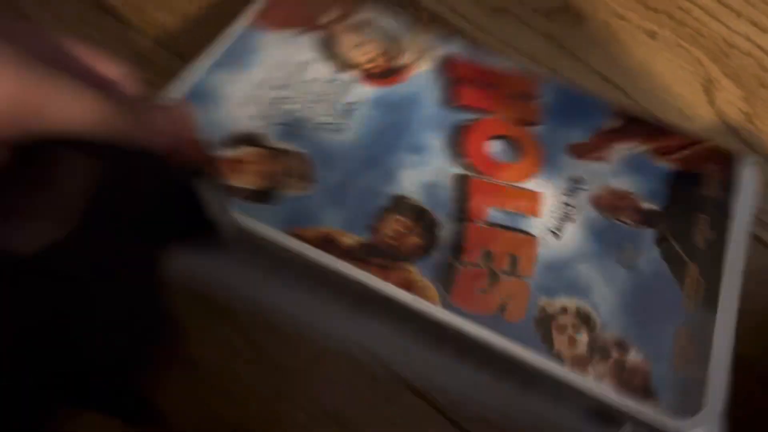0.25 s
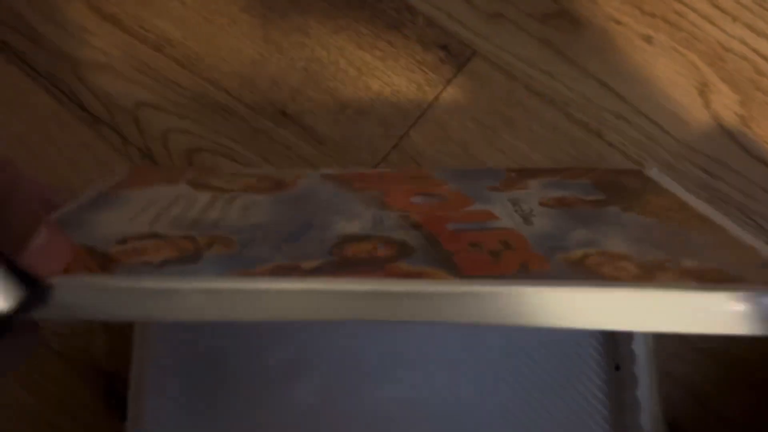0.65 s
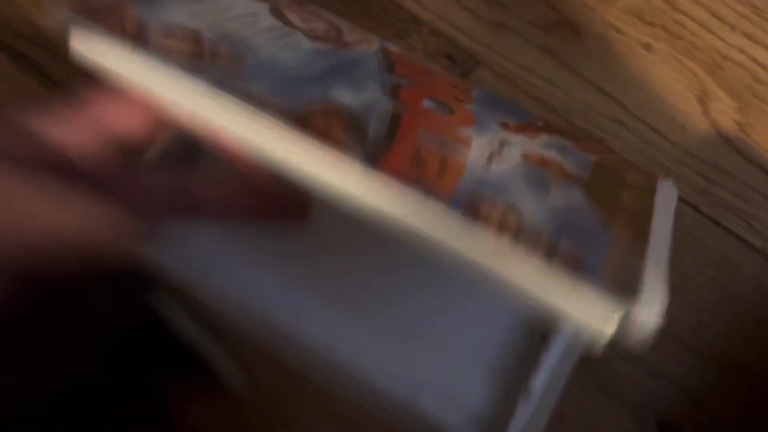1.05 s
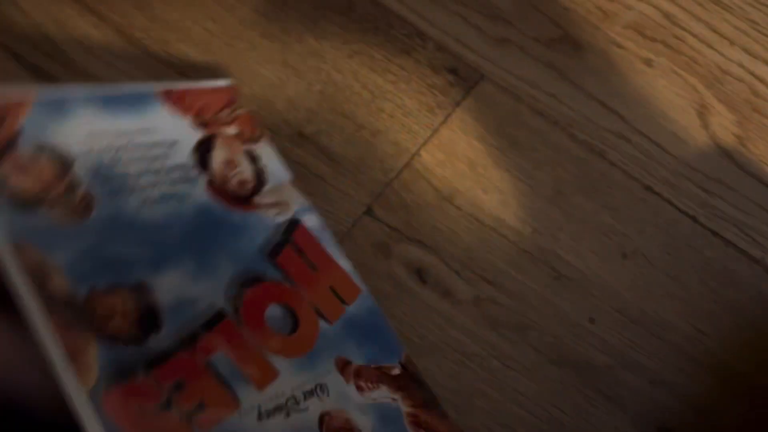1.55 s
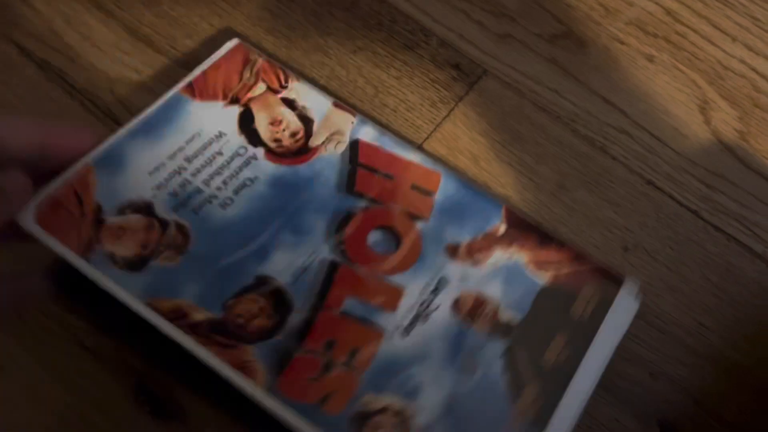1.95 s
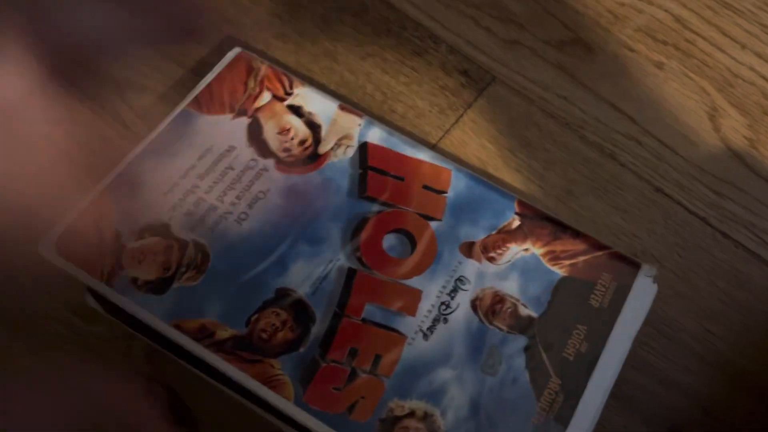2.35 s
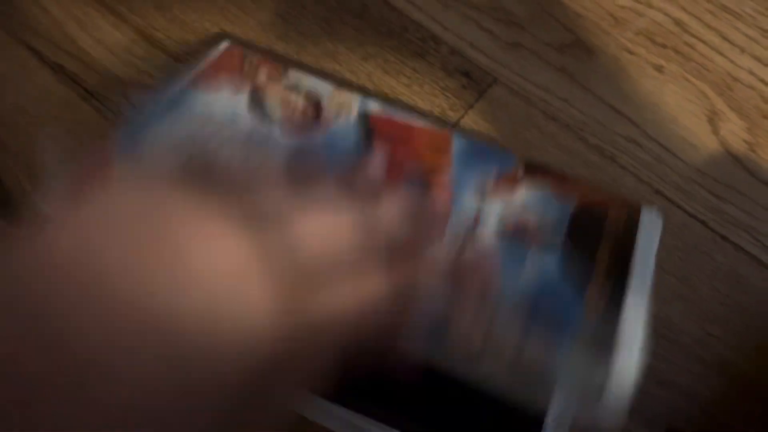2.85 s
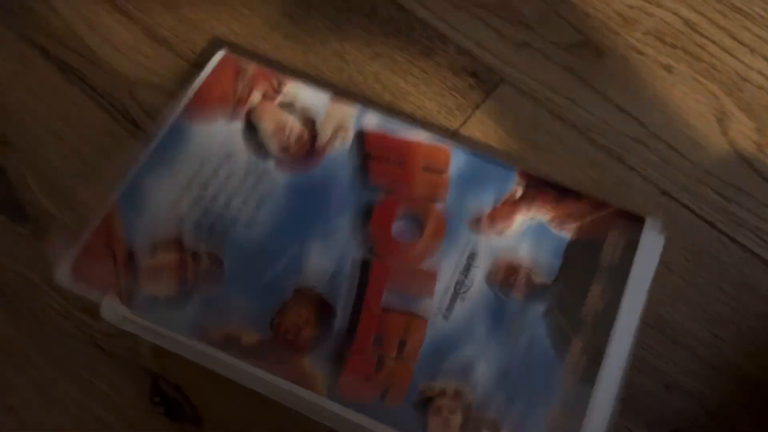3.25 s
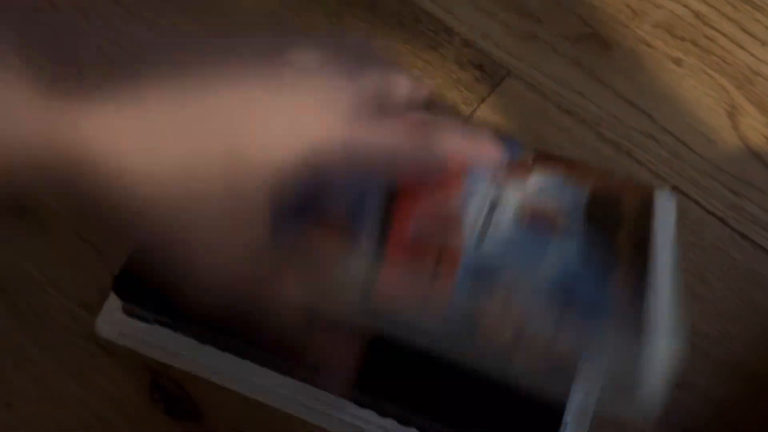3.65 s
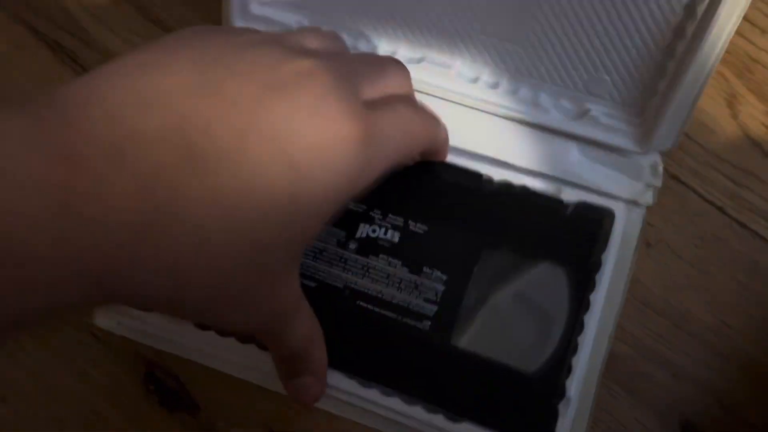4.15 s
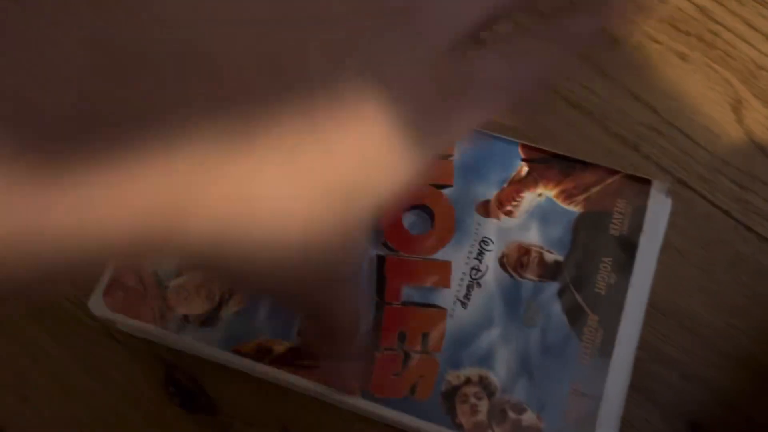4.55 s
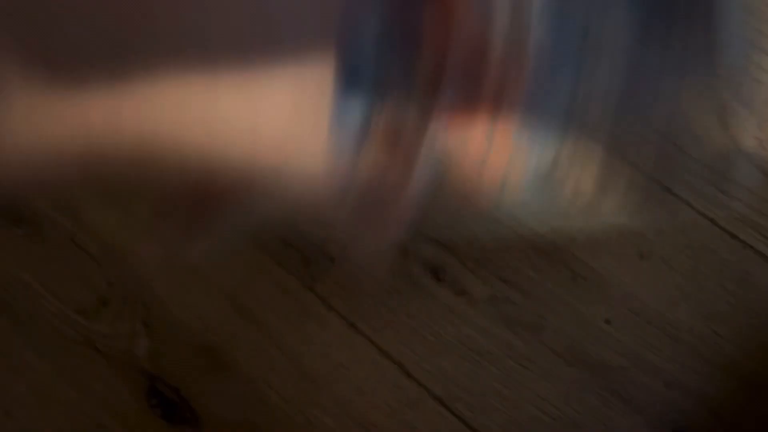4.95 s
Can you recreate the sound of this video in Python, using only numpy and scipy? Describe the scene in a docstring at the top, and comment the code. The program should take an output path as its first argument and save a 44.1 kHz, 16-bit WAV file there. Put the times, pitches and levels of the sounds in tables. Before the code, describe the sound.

A plastic cassette case is handled on floorboards, very near the microphone. Quiet clicks and sliding come first, then a loud double clatter with a brief scrape, a flat lid slap with a soft thud, finger pats, a sharp knock at 3.2 seconds, and more catches snapping near 4.5. The small room is dry, with faint steady hum.

```python
"""Hands rub a plastic clamshell video case and its clear sleeve, close by, on a wooden floor in a small room.
Near 1.9 s the cassette slides in and clatters into its tray; at 2.5 s the lid is slapped shut; then it is
pried open again, its rim ticking and crackling. Contacts are decaying noise bands with a panel note, rubs
are trains of tiny slips; both excite the shell's resonances. Boards thud as damped tones under pushes.
Throughout lie a sine of mains hum, a faint whirr and the soft rush of the room, both filtered noise."""
import sys
import numpy as np
from scipy import signal
from scipy.fft import rfft, irfft, next_fast_len
from scipy.io import wavfile

SR = 44100
rng = np.random.default_rng(int(sys.argv[2]) if len(sys.argv) > 2 else 0)


def store_wav(level_fs):
    """Save 16-bit WAV to argv[1]."""
    pcm = np.round(np.clip(np.atleast_2d(level_fs), -1, 1) * 32767)
    wavfile.write(sys.argv[1], SR, pcm.T.astype(np.int16))


N = 229533
TIME = np.arange(N) / SR

# the case knocks against cassette, lid and floor
# columns: start_s, level_db, brightness_db_per_octave, note_hz, note_relative_to_level_db
KNOCKS = [(0.016, -30.5, -0.5, 656, -3), (0.373, -30, 1.9, 3830, -2), (0.597, -36.5, 0.5, 900, 0.5),
          (1.085, -31, 0.5, 580, -3.5), (1.222, -34, 1.7, 666, -4), (1.333, -31.5, -3.5, 1290, -11),
          (1.579, -25.5, 0, 950, -4), (1.851, -14.5, 1, 720, 3), (1.857, -13, -1, 776, -9),
          (1.876, -22, 0, 1175, 1), (1.902, -11.5, -1.5, 1140, 2.3), (1.907, -19.5, 0.6, 567, -2),
          (1.96, -34.5, 2.5, 687, 8), (1.971, -31, 1.5, 760, -5), (1.983, -28, 0.7, 913, -5),
          (1.991, -22, 0, 990, 1), (2.002, -34.5, 2.7, 446, 11.5), (2.046, -34, -0.6, 1160, 5.5),
          (2.499, -30, 2, 800, 12), (2.512, -14.5, -0.2, 440, -8.5), (2.528, -28, -5.5, 800, -7),
          (3.228, -14, -0.3, 710, -7), (3.234, -19.5, 1.56, 660, -5.5), (3.442, -37.5, 2.5, 450, 5),
          (3.975, -37, -0.8, 900, -8), (4.021, -31, -3, 910, -14), (4.038, -28, 0.7, 1184, 4),
          (4.459, -21.5, -3, 680, -2.5), (4.461, -26.5, -6, 227, 8), (4.576, -19.5, -4, 930, -16),
          (4.578, -16, -1.1, 1028, 4), (4.589, -23.5, -4.1, 372, 3.5), (4.706, -28.5, -1.7, 430, -2.5),
          (4.797, -31, 1.5, 1155, -7), (4.896, -37.5, -2, 1090, -5)]
# how a knock shares out its level: thump_db, body_db, clack_db, snap_db
KNOCK_SHARES = [-13, -1, -1.5, -4.5]


def knocks():
    """Impact of hard bodies: short broadband chatter, strong in body and clack."""
    return contacts(KNOCKS, KNOCK_SHARES, base_t60_s=0.026)


# palm and fingertips pat the hollow lid
# columns: start_s, level_db, brightness_db_per_octave, note_hz, note_relative_to_level_db
PATS = [(0.054, -40, 4, 663, 8), (0.643, -39.5, 6, 680, -1), (2.504, -11.5, -0.2, 533, -9.5),
        (2.645, -32, -1.5, 566, 2.5), (2.684, -33, -4.7, 660, 5), (2.69, -31.5, 3.7, 664, -8),
        (2.709, -25.5, 2.3, 612, 6.5), (2.79, -36.5, 0.5, 1210, 4), (3.46, -41, -3.5, 606, 9.5),
        (4.485, -29.5, 4, 440, -5), (4.847, -37.5, -3, 600, -3), (5.098, -37, 0.4, 348, -10)]
# how a pat shares out its level: thump_db, body_db, clack_db, snap_db
PAT_SHARES = [-14, 1.5, -24, -26]


def pats():
    """Soft impact: a yielding hand rings longer and shares little level with the upper registers."""
    return contacts(PATS, PAT_SHARES, base_t60_s=0.033)


# the rim and the catches tick as they flex
# columns: start_s, level_db, brightness_db_per_octave, note_hz, note_relative_to_level_db
TICKS = [(0.36, -22, -0.8, 4050, -11), (0.418, -35.5, -1.5, 2920, -2), (0.49, -33, 0, 4120, -12),
         (0.498, -42.5, -2, 4200, 9), (0.531, -37, -1, 2880, -5), (0.542, -28.5, -0.6, 2770, -0.5),
         (0.844, -40, -3, 3380, 2.5), (1.144, -38, 0, 4560, -4), (1.406, -31, -5, 1680, 0),
         (1.63, -25.5, -0.8, 2990, -19), (1.716, -29, 3.24, 3470, -23), (1.935, -52, 9.5, 970, -1.5),
         (2.073, -40.5, 0.7, 1270, -10), (2.133, -41, -0.5, 453, -7), (2.858, -39.5, -0.6, 2860, -9.5),
         (3.379, -40, 1.5, 2470, 0), (3.697, -38.5, 1.7, 4000, -11), (3.706, -43, 5, 2320, -13),
         (3.747, -32, -3, 1110, -3.5), (3.785, -31, 1, 4710, -5), (3.801, -38.5, 5, 2270, -12),
         (3.883, -32, -4.5, 1670, -17), (4.22, -37, 1.7, 4620, -0.5), (4.302, -30, -3, 1550, 4.5),
         (4.416, -43.5, 3.5, 1350, 6.5), (4.429, -45.5, 4.7, 1010, -6), (4.458, -22, -2, 2060, -0.8),
         (4.57, -31, 1, 1870, -8), (4.746, -44.5, 2.9, 1140, -12), (5.062, -35.5, -3.1, 1960, -8),
         (5.14, -35.5, -0.9, 614, -6.5), (5.157, -31.5, -0.4, 2660, -9)]
# how a tick shares out its level: thump_db, body_db, clack_db, snap_db
TICK_SHARES = [-23, -10, -1, -4]


def ticks():
    """Sudden release of strain in small parts: the briefest decay, weighted to the treble."""
    return contacts(TICKS, TICK_SHARES, base_t60_s=0.022)


# the ranges of thump, body, clack and snap; columns: low_hz, high_hz
REGISTERS = [(195, 371), (335, 1125), (1400, 3870), (4500, 11440)]


def contacts(rows, shares_db, base_t60_s, thump_ring=2.4, body_ring=1.1, clack_ring=0.97, snap_ring=0.66,
             note_ring=0.9, softness=0.04, thump_rise_s=0.0056, note_rise_s=0.0017, grit_db=4.0,
             brush_s=0.004, brush_db=-17.0):
    """Impact excitation: dying chatter of the rim in four registers, and the note of the bent panel (mid, side)."""
    since_blow = TIME[:SR // 5] - brush_s
    t = np.maximum(since_blow, 0)
    # the edges brush each other just before the full blow lands
    brush = from_db(brush_db) * np.minimum(1 + since_blow / brush_s, 1) ** 2
    out = np.zeros((2, N + len(t)))
    attack_samples = SR // 125
    filters = [signal.butter(2, edges, "band", fs=SR, output="sos") for edges in REGISTERS]
    # positive brightness tilts the registers towards the treble, about 1000 Hz
    octaves = np.log2(np.array(REGISTERS) / 1000).mean(axis=1)
    # kinds that ring longer also start more slowly; the thump has a slow rise of its own
    rises_s = [thump_rise_s] + [softness * base_t60_s] * 3
    ring_factors = (thump_ring, body_ring, clack_ring, snap_ring)
    for start_s, level_db, brightness, note_hz, note_db in rows:
        first = int(max(start_s - brush_s, 0) * SR)
        parts = []
        for sos, rise_s, ring_factor in zip(filters, rises_s, ring_factors):
            grit = from_db(grit_db * rng.standard_normal(len(t)))
            chatter = rng.standard_normal((2, len(t))) * grit
            decay = from_db(-60 * t / (base_t60_s * ring_factor))
            force = (brush + 1 - np.exp(-t / rise_s)) * decay
            parts.append(signal.sosfilt(sos, chatter * force + 1e-18))
        note = ring(t, note_hz, base_t60_s * note_ring, note_rise_s)
        parts.append(note * rng.choice([-1, 1], (2, 1)))
        parts_db = level_db + np.append(shares_db + brightness * octaves, note_db)
        for part, part_db in zip(parts, parts_db):
            # a level is the part's whole energy spread over 8 ms
            strength = np.sqrt(np.sum(part ** 2, axis=1, keepdims=True) / attack_samples)
            out[:, first:first + len(t)] += from_db(part_db) * part / strength
    return out[:, :N]


# spectrum of juddering drag; columns: frequency_hz, relative_density_db_per_hz
DRAG = [(60, -18.5), (180, -13), (330, -3), (650, -0.5), (1150, 0.5), (1550, -1.5), (2400, -14.5),
        (4000, -17), (9000, -36.5)]
# spectrum of smooth sliding; columns: frequency_hz, relative_density_db_per_hz
SLIDE = [(300, -12.5), (1000, -15), (1800, -2), (3500, -1.5), (6500, -6), (9000, -7), (13000, -12),
         (16000, -23.5)]


def rubbing(drag_trim_db=-1.5, pocket_db=-4.5, slide_trim_db=1.0, judder_db=3.0, flutter_db=2.5, crinkle_db=-8.0):
    """Stick-slip friction: coarse slips judder and sound the air pocket; very fine slips hiss (mid, side)."""
    drag_strength, slide_strength, pocket_hz = motion()
    slips = grains(per_s=800, spread_db=1.0)
    drag = from_db(drag_trim_db) * rms_one(colour(slips, DRAG))
    drag = drag + from_db(pocket_db) * pocket(slips, pocket_hz)
    slide = rms_one(colour(grains(per_s=6000, spread_db=3.5), SLIDE))
    slide += from_db(crinkle_db) * sleeve_crinkle()
    drag *= drag_strength * from_db(judder_db * drift(90))
    slide *= slide_strength * from_db(slide_trim_db + flutter_db * drift(110))
    return drag + slide


def sleeve_crinkle(t60_s=0.014):
    """Buckling of thin film: the clear sleeve gives tiny ticks at twelve pitches; rms 1."""
    crinkle = np.zeros((2, N))
    for hz in np.geomspace(1500, 5500, num=12):
        buckles = grains(per_s=11, spread_db=7.0)
        tick = ring(TIME[None, :SR // 20], hz, t60_s, 1 / hz)
        crinkle += signal.fftconvolve(buckles, tick, axes=1)[:, :N]
    return rms_one(crinkle)


def pocket(x, centre_hz, width_hz=140, block=128):
    """Cavity resonance gliding with the air pocket between hand, lid and tray; rms 1."""
    radius = np.exp(-np.pi * width_hz / SR)
    out, state = np.zeros_like(x), np.zeros((2, 2))
    for i in range(0, N, block):
        poles = [1, -2 * radius * np.cos(2 * np.pi * centre_hz[i] / SR), radius ** 2]
        out[:, i:i + block], state = signal.lfilter([1, 0, -1], poles, x[:, i:i + block], zi=state)
    return rms_one(out)


# strokes of plastic over plastic and skin, 20 dB down one swell before and one fade after the fastest moment
# columns: fastest_s, swell_s, fade_s, relative_drag_db, relative_slide_db, pocket_hz
STROKES = [(0.05, 0.1, 0.12, -41.5, -53, 660), (0.259, 0.16, 0.2, -42.5, -63, 1140),
           (0.39, 0.17, 0.052, -40, -34, 1110), (0.51, 0.04, 0.22, -45, -38.5, 1100),
           (0.62, 0.1, 0.12, -42.5, -46.5, 1320), (0.75, 0.08, 0.18, -49.5, -50, 1100),
           (0.9, 0.13, 0.4, -51, -45.5, 1100), (1.12, 0.07, 0.031, -42, -43.5, 648),
           (1.24, 0.045, 0.26, -45, -45.5, 800), (1.34, 0.17, 0.15, -43, -34, 860),
           (1.66, 0.12, 0.2, -41, -40, 980), (1.77, 0.15, 0.2, -48, -39.5, 1030),
           (1.885, 0.055, 0.098, -20.5, -24.5, 775), (2.0, 0.08, 0.059, -22, -33.5, 876),
           (2.08, 0.05, 0.13, -40.5, -57.5, 850), (2.525, 0.012, 0.1, -28, -33.5, 750),
           (2.711, 0.038, 0.021, -29, -44, 610), (2.8, 0.06, 0.17, -43.5, -48.5, 1240),
           (2.92, 0.12, 0.21, -55, -57.5, 1200), (3.39, 0.035, 0.086, -30.5, -35, 890),
           (3.435, 0.05, 0.045, -35, -48.5, 604), (3.585, 0.02, 0.055, -41, -44, 860),
           (3.66, 0.06, 0.06, -46.5, -47.5, 1000), (3.77, 0.035, 0.072, -44.5, -42.5, 2210),
           (4.043, 0.06, 0.1, -31.5, -40.5, 906), (4.118, 0.03, 0.16, -45.5, -55, 800),
           (4.464, 0.073, 0.05, -36, -38.5, 600), (4.751, 0.055, 0.053, -33, -41, 1110),
           (4.915, 0.05, 0.035, -40.5, -55.5, 1120), (5.18, 0.1, 0.067, -44, -45, 1160)]


def motion(shudder_drag_db=-20.5, shudder_slide_db=-30.5, shudder_rise_s=0.017, shudder_fall_s=0.075):
    """Addition of powers: strokes and shudders sum to drag and slide strength; drag weights the pocket's note."""
    # a knock or pat leaves the cassette shuddering in its tray, at levels set against the blow
    shudders = [(start_s + shudder_rise_s, shudder_rise_s, shudder_fall_s,
                 level_db + shudder_drag_db, level_db + shudder_slide_db, note_hz)
                for start_s, level_db, _, note_hz, _ in KNOCKS + PATS]
    columns = np.transpose(STROKES + shudders)[:, :, None]
    fastest_s, swell_s, fade_s, drag_db, slide_db, pocket_hz = columns
    t = TIME[::SR // 1000]
    shape_db = -20 * np.maximum((fastest_s - t) / swell_s, (t - fastest_s) / fade_s)
    drag_power = from_db(drag_db + shape_db) ** 2
    slide_power = from_db(slide_db + shape_db) ** 2
    total_drag = drag_power.sum(axis=0)
    mean_pocket_hz = (pocket_hz * drag_power).sum(axis=0) / total_drag
    controls = np.sqrt(total_drag), np.sqrt(slide_power.sum(axis=0)), mean_pocket_hz
    return [np.interp(TIME, t, control) for control in controls]


# resonances of the shell and the air in it; columns: frequency_hz, width_hz, level_relative_to_direct_db
SHELL = [(171, 19, -1), (262, 9.9, -7.5), (376, 44, -9.5), (451, 25, -3), (566, 33, -9), (699, 70, -6.5),
         (927, 27, -10), (1150, 18, -2.5), (2232, 220, -5), (2680, 370, -11.5), (3440, 23, -29.5),
         (3930, 27, -26), (4840, 92, -5)]


def shell(x, output_db=-2.5):
    """Modal resonance: whatever touches the case also sets its modes ringing, in parallel."""
    out = x.copy()
    for hz, width_hz, level_db in SHELL:
        radius = np.exp(-np.pi * width_hz / SR)
        zeros = np.array([1, 0, -1]) * (1 - radius * radius) / 2
        poles = [1, -2 * radius * np.cos(2 * np.pi * hz / SR), radius * radius]
        out += from_db(level_db) * signal.lfilter(zeros, poles, x)
    return from_db(output_db) * out


# weight coming down on the floorboards; columns: start_s, level_db, pitch_hz
THUDS = [(1.089, -34, 85), (1.468, -43.5, 69.5), (1.527, -42, 69.5), (1.579, -31, 79.3), (1.65, -39, 73),
         (1.91, -32.5, 83), (2.519, -22.5, 73), (3.236, -28.5, 119.6), (4.461, -26.5, 94),
         (4.591, -25.5, 75)]


def floorboards(t60_s=0.11, rise_s=0.0023, overtone=1.8, overtone_db=-8.0, overtone_t60_s=0.1):
    """Damped bending vibration: a short, deep thud under each push, with one quicker overtone."""
    out = np.zeros(N)
    for start_s, level_db, pitch_hz in THUDS:
        t = np.maximum(TIME - start_s, 0)
        thud = ring(t, pitch_hz, t60_s, rise_s)
        thud += from_db(overtone_db) * ring(t, pitch_hz * overtone, overtone_t60_s, rise_s)
        out += from_db(level_db) * thud
    return out


def room(mid, t60_s=0.16, level_db=-13, build_s=0.0018, treble_db=-9.0):
    """Diffuse reverberation: dense, slightly dull reflections from floor, walls and furniture (mid, side)."""
    t = TIME[:SR // 2]
    build = 1 - np.exp(-(t / build_s) ** 2)
    tail = rng.standard_normal((2, len(t))) * from_db(-60 * t / t60_s) * build
    tail /= np.sqrt(np.sum(tail ** 2, axis=1, keepdims=True))
    tail = colour(tail, [(150, 1.0), (900, -6.5), (4000, -0.2), (12000, treble_db)])
    return from_db(level_db) * signal.fftconvolve(mid[None], tail, axes=1)[:, :N]


# spectrum of the room's rush; columns: frequency_hz, relative_density_db_per_hz
ROOM_AIR = [(20, -30.5), (35, -5), (65, -6.5), (95, -6), (160, -9.5), (350, -10.5), (700, -16), (1150, -16),
            (1450, -9), (1800, -18), (4000, -23.5), (8000, -39.5), (16000, -43)]


def room_rush(level_db=-53):
    """Stationary noise: random air motion, shaped to a soft rush (mid, side)."""
    return from_db(level_db) * rms_one(colour(rng.standard_normal((2, N)), ROOM_AIR))


def whirr(centre_hz=1430, width_hz=150, level_db=-69):
    """Narrow-band noise: a slim band of the rush stands out as a faint whirr (mid, side)."""
    edges = [centre_hz - width_hz / 2, centre_hz + width_hz / 2]
    band = signal.butter(2, edges, "band", fs=SR, output="sos")
    return from_db(level_db) * rms_one(signal.sosfilt(band, rng.standard_normal((2, N))))


def hum(hz=59.9, rms_db=-56):
    """Periodic vibration: the steady mains hum is one pure tone."""
    return np.sqrt(2) * from_db(rms_db) * np.sin(2 * np.pi * hz * TIME)


def background():
    """Superposition: rush and whirr in mid and side, hum in mid alone."""
    air = room_rush() + whirr()
    air[0] += hum()
    return air


# how far the two microphone ports differ; columns: frequency_hz, side_gain_db
WIDTH = [(60, -12), (300, -9), (700, -8), (1400, -5), (4000, -7), (8000, -8), (15000, -49.5)]
# level between the ports; columns: frequency_hz, left_minus_right_db
BALANCE = [(60, 0.5), (130, 4), (290, 3.5), (480, 0), (680, -1.5), (1300, 0), (1900, 1), (2500, -0.5),
           (3400, 4), (5300, 2.5), (6200, -1), (16000, 0.5)]
# phase between the ports; columns: frequency_hz, left_lead_rad
LEAD = [(0, 0), (550, -.3), (800, .2), (2200, .2), (2800, .8), (4500, .4), (5500, -.4), (7400, -.2),
        (9700, -3.1), (11200, -3.9), (12100, -6.1), (13900, -6.6), (14700, -8.8), (16000, -9.4)]


def ports(mid, side):
    """Interaural-like cues: two ports hear level and phase differences that depend on frequency."""
    size = 2 * next_fast_len(N)
    hz = np.arange(size // 2 + 1) * SR / size
    half_level = from_db(np.interp(hz, *np.transpose(BALANCE)) / 2)
    half_phase = np.exp(0.5j * np.interp(hz, *np.transpose(LEAD)))
    half = half_level * half_phase
    side = colour(side, WIDTH)
    left_right = np.array([mid + side, mid - side])
    return irfft(rfft(left_right, size) * np.array([half, 1 / half]))[:, :N]


def from_db(db):
    """Logarithmic level: decibels to amplitude gain."""
    return 10 ** (np.asarray(db) / 20)


def rms_one(x):
    """Effective value: scale to unit rms."""
    return x / np.sqrt(np.mean(x ** 2) + 1e-20)


def ring(t, hz, t60_s, rise_s):
    """Damped oscillation: a sine that builds up and dies exponentially."""
    return np.sin(2 * np.pi * hz * t) * from_db(-60 * t / t60_s) * (1 - np.exp(-t / rise_s))


def grains(per_s, spread_db):
    """Poisson process: random tiny slips of uneven size (mid, side); rms 1."""
    born = rng.random(N) < per_s / SR
    size = from_db(spread_db * np.minimum(rng.exponential(1, N), 3))
    return rms_one(born * size * rng.choice([-1, 1], (2, N)))


def drift(per_s):
    """Random modulation: straight lines between chance values, per_s of them a second; rms 1."""
    knots = rng.standard_normal(N // 20)
    return rms_one(np.interp(TIME * per_s, np.arange(len(knots)), knots))


def colour(x, points):
    """Minimum-phase filtering: a causal filter, by way of the cepstrum, follows a table of (Hz, dB)."""
    size = 2 * next_fast_len(x.shape[-1])
    table_hz, table_db = np.transpose(points)
    hz = np.arange(size // 2 + 1) * SR / size
    gain_db = np.interp(np.log(hz + 1), np.log(table_hz), table_db)
    cepstrum = irfft(np.log(from_db(gain_db)))
    # folding the cepstrum onto positive time makes the filter causal
    cepstrum[1:size // 2] *= 2
    cepstrum[size // 2 + 1:] = 0
    return irfft(rfft(x, size) * np.exp(rfft(cepstrum)))[..., :x.shape[-1]]


def scene():
    """Superposition: the case, the floor, the room and its background, as left and right."""
    case = shell(knocks() + pats() + ticks() + rubbing())
    mid, side = case + room(case[0]) + background()
    return ports(mid + floorboards(), side)


# colour of the microphone; columns: frequency_hz, gain_db
MICROPHONE = [(30, 6), (150, 3.5), (600, 0.5), (1500, -1.5), (4000, -2.5), (6500, -0.5), (9000, -4),
              (11500, -2), (14000, -0.5), (16000, 8.5)]


def record(dry, low_cut_hz=32, top_stop_hz=17000):
    """Transducer response: colour, loss of the deepest bass, soft saturation of peaks and a steep top cut."""
    low_cut = signal.butter(2, low_cut_hz, "high", fs=SR, output="sos")
    heard = signal.sosfilt(low_cut, colour(dry, MICROPHONE))
    rounded = np.tanh(heard)
    # 70 dB down from the stop frequency upwards
    top_cut = signal.cheby2(14, 70, top_stop_hz, fs=SR, output="sos")
    return signal.sosfilt(top_cut, rounded)


dry = scene()
out = record(dry)
store_wav(out)
```